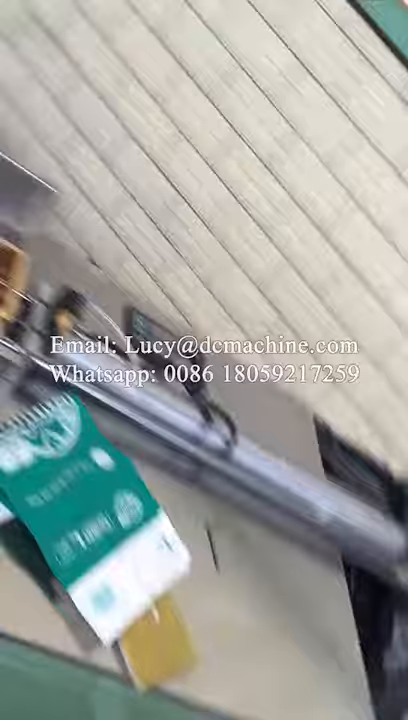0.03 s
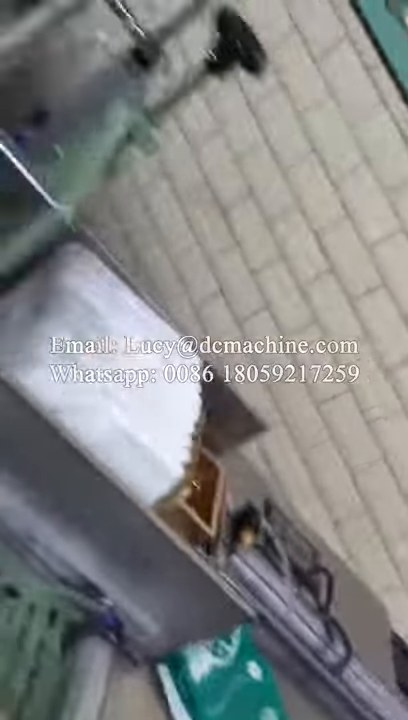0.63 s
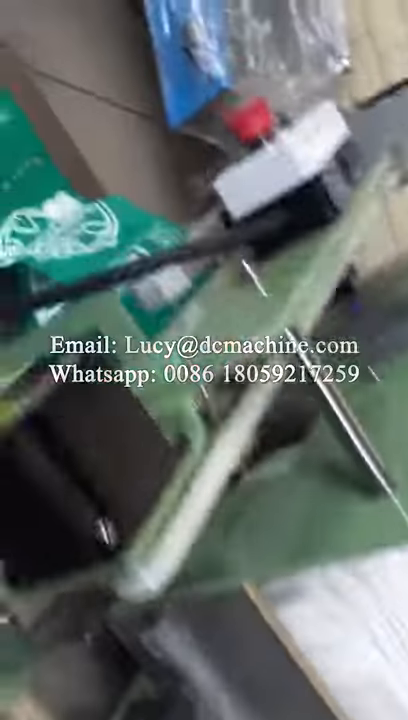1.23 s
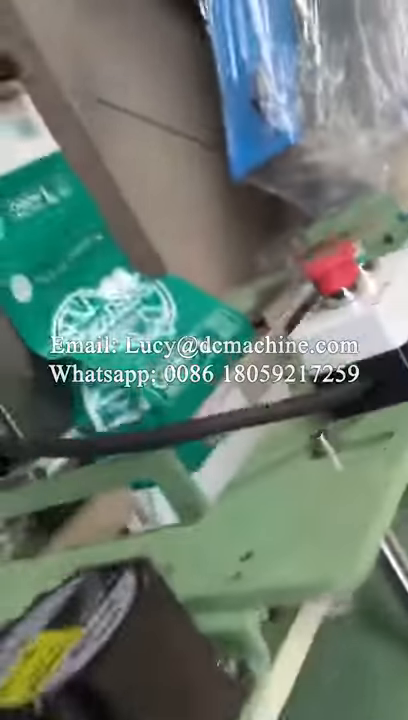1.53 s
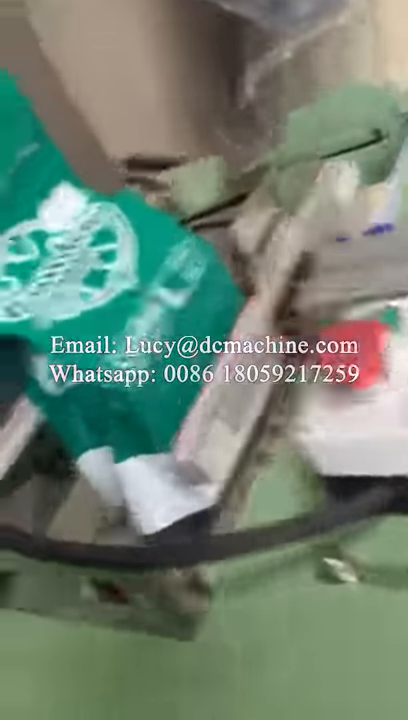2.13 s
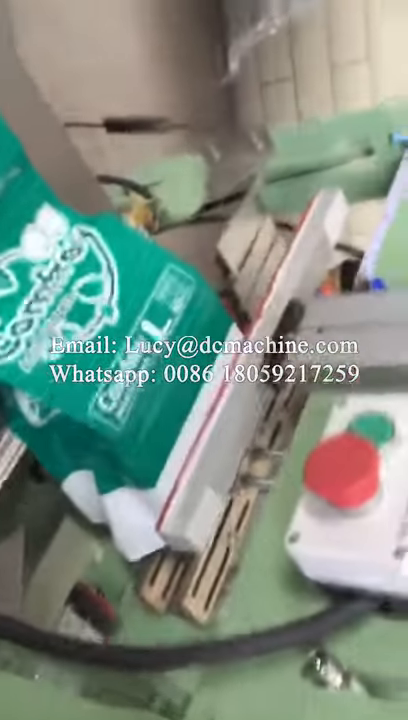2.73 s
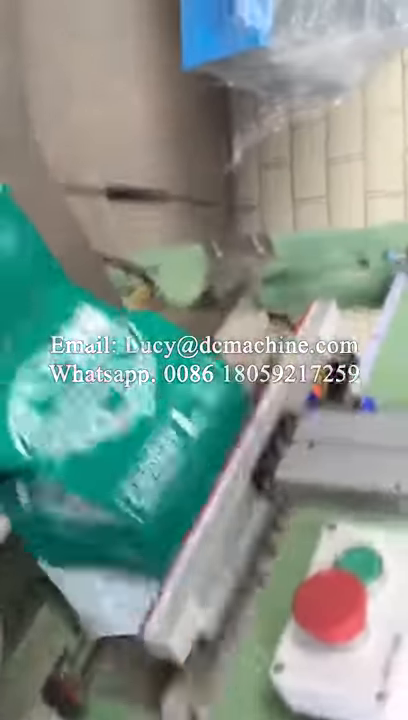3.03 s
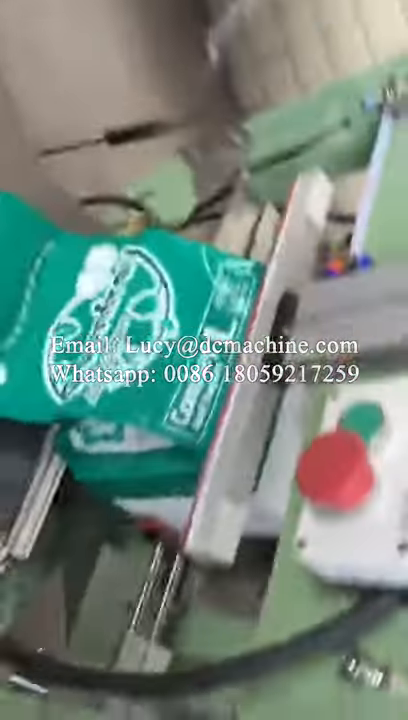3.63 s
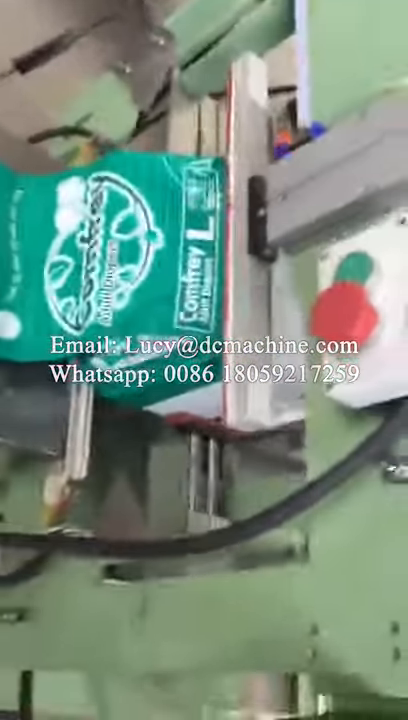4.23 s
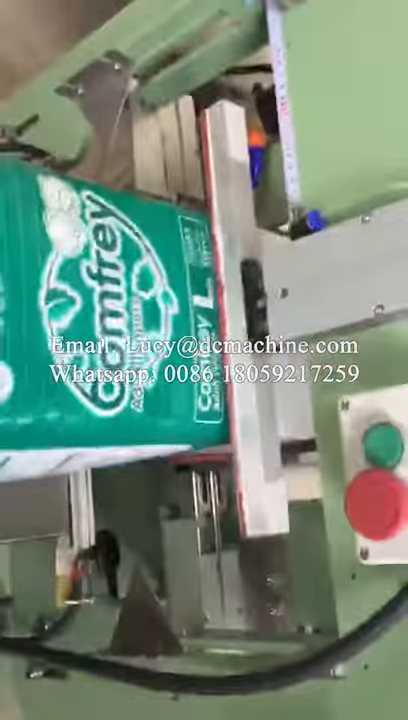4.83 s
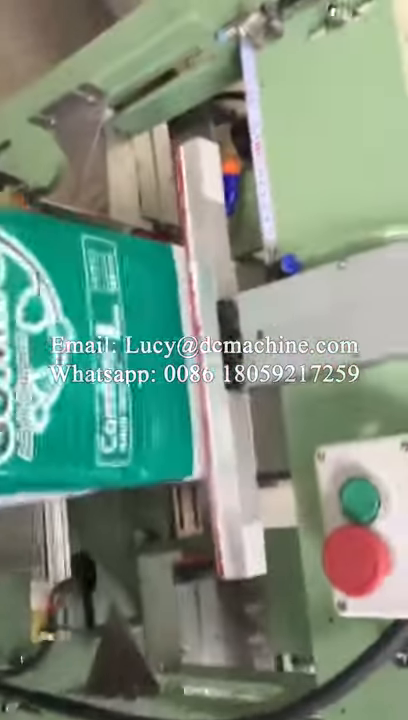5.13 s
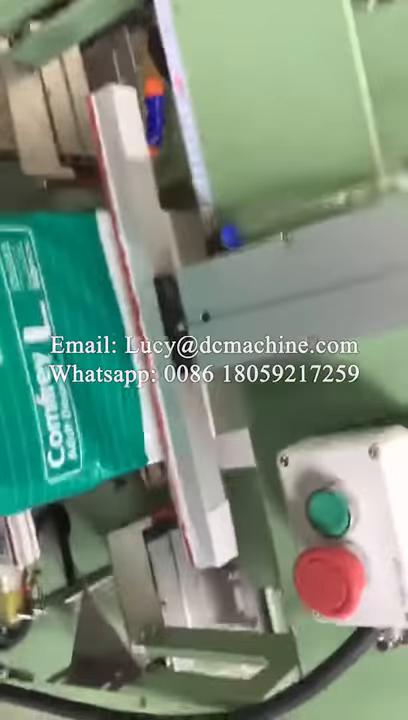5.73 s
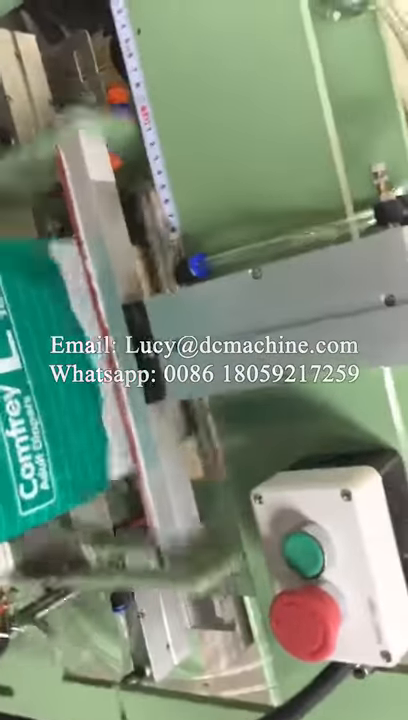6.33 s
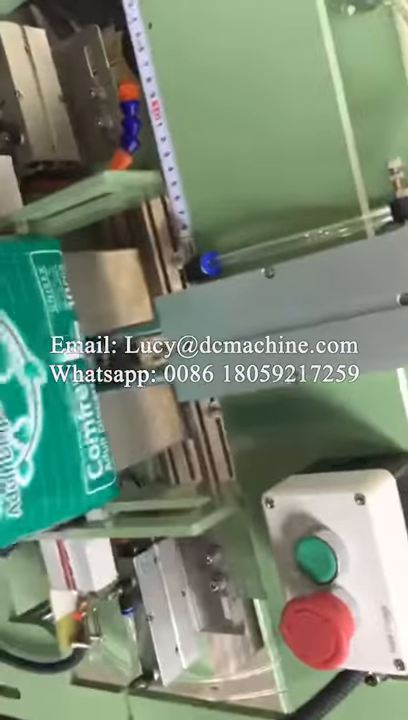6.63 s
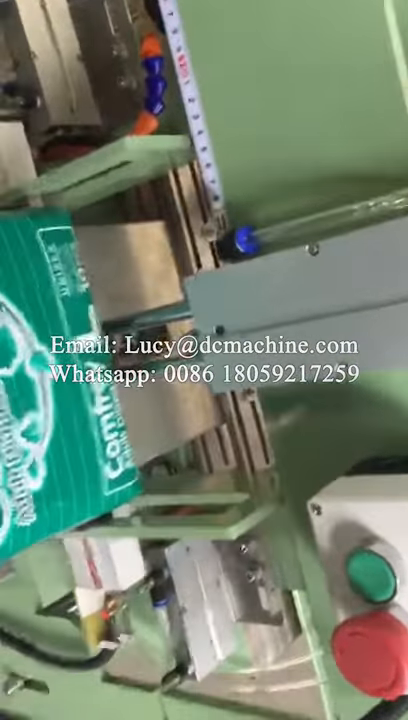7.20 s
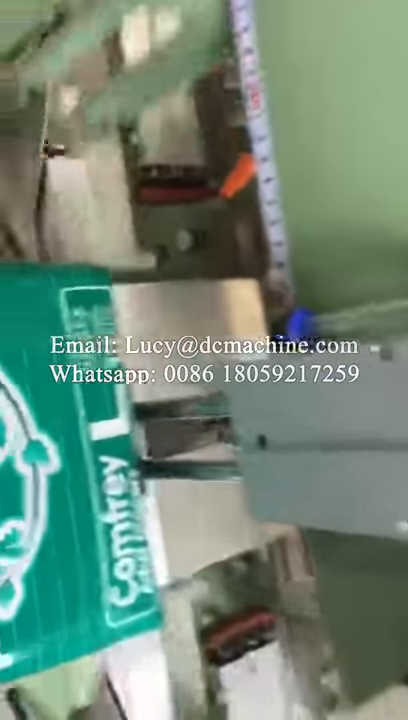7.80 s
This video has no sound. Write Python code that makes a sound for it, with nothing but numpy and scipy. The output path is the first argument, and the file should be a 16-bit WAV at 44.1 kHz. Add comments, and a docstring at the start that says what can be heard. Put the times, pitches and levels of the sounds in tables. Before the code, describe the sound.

A bagging machine clunks, hisses air, scrapes and clashes shut through one cycle, over steady motor whine and factory hum.

```python
"""A pneumatic bagging machine runs one cycle in a factory hall, amid motor whine, hum and leaking air.
Near 3 s the bag opener slams into its stops, ringing the steel frame, and valves vent with whistles
that fall with the cylinder pressure. From 3.8 s an air jet holds the bag open; near 4.8 s the pusher
scrapes over its bed and strikes home. More valves vent, and near 6.5 s the sealing clamp clashes
shut. A few lighter knocks follow, and the motor whines on."""
import sys
import numpy as np
from scipy import signal
from scipy.fft import rfft, irfft, next_fast_len
from scipy.io import wavfile
from scipy.ndimage import uniform_filter1d, map_coordinates

SR = 44100
rng = np.random.default_rng(int(sys.argv[2]) if len(sys.argv) > 2 else 0)


def to_wav(sig):
    """Store sig (one row per channel, or 1-D mono) as 16-bit WAV at the path in sys.argv[1].

    Samples outside -1..1 are clipped; the rate is SR.
    """
    pcm = np.clip(np.atleast_2d(sig), -1, 1) * 32767
    pcm = np.round(pcm).astype(np.int16)
    wavfile.write(sys.argv[1], SR, pcm.T)  # frames by channels


N = 355446

# Valve exhausts: (time [s], length [s], hold [s], first pitch [Hz], limit pitch [Hz],
# half-emptying time [s], relative whistle level [dB], its fall [dB/s],
# lower whistle against it [dB], relative puff level [dB], its fall [dB/s])
VENTS = [(3.005, 0.046, .014, 6800, 3020, .07, -30.5, 20, -5, -30.5, 10),
         (3.312, 0.35, .024, 8060, 1705, .125, -33, 25, -2.5, -26, 15.5),
         (4.96, 0.03, 0.023, 5920, 4000, 0.13, -37.5, 42, -2, -31, 45),
         (5.877, 0.32, 0.037, 6350, 3795, .07, -33, 15, -1, -30.5, 35),
         (6.23, 0.25, .028, 6330, 3804, .07, -34, 25, -1.5, -32.5, 23)]
# Modes of the steel at the bag opener: (frequency [Hz], relative level [dB], t60 [s])
OPENER_MODES = [(86.4, -25.5, .2), (176, -7.5, 0.13), (210, -10, .13), (261, -13, 0.082), (349, -11, 0.082),
                (428, -13.5, 0.14), (848, -16, 0.098), (951, -12.5, 0.12), (1117, -18, 0.15),
                (1591, -15, 0.21), (1890, -20, .16), (2790, -20, .13), (3630, -14, 0.14), (5450, -20, .12),
                (5938, -22, .13), (6304, -24, .13)]


def blows(bounce_s=.0135, dulling_db_per_octave=2.7):
    """Inelastic impact: opener, pusher and clamp hit their stops, each blow with one duller rebound."""
    # Blows of each part: (time [s], relative level [dB], tilt [dB/octave], body frequency [Hz],
    # body boost [dB], rattle t60 [s], rebound against the blow [dB])
    opener_blows = [(2.937, -40.5, 4, 1320, 13.5, 0.054, -13), (2.996, -46.5, -4, 330, 7.5, .15, -4),
                    (3.04, -36.5, 3.5, 2320, 6.3, 0.21, -3), (3.135, -41, 4, 2000, 8, 0.055, -20),
                    (3.163, -24.5, 1.3, 364, 7.5, 0.19, -9), (3.177, -25, -0.5, 200, 12.5, 0.094, -23),
                    (3.192, -30.5, 2, 1900, 8.5, .06, -4), (3.243, -41, -3, 172, 11, 0.14, -10),
                    (3.268, -23.5, 1.3, 656, 9.5, 0.074, -2), (3.31, -40.5, -3.5, 220, 10, .1, -11),
                    (3.433, -35.5, -1.5, 950, 14.5, 0.062, -7),
                    (3.8037, -35.5, -1.3, 300, 12.7, 0.054, -16.5)]
    pusher_blows = [(4.806, -38, -0.5, 1310, 18, 0.14, -12), (4.862, -39, -0.5, 390, 16, 0.1, -2.5),
                    (4.878, -33, 0, 1900, 11, .073, 0.5), (4.8987, -25, 2, 4200, 3, 0.017, -6),
                    (4.904, -24.5, 1.5, 3000, 12, 0.018, -7), (4.921, -38.5, -1.5, 330, 12, 0.073, -14),
                    (5.013, -33.5, 3.5, 3000, 5.5, .016, -20), (5.1505, -29, -0.5, 750, 7.7, 0.086, -4.5),
                    (5.159, -32, 2, 3000, 4, .05, -6), (5.168, -30, -2, 148, 7.7, 0.32, -10),
                    (5.183, -31.5, -2, 850, 11.2, 0.16, -19), (5.222, -36.5, -1.5, 200, 5.2, 0.6, -19),
                    (5.379, -45, -1, 400, 11.6, 0.39, -12)]
    clamp_blows = [(6.4448, -28, 1, 850, 12.2, 0.1, -7), (6.458, -27, 0.3, 360, 13.8, 0.083, -6),
                   (6.473, -32, 2.5, 2010, 8.4, .08, -12), (6.4815, -21.5, 3.1, 382, 9.7, 0.079, -4.5),
                   (6.521, -29, -1, 420, 9, 0.044, -16), (6.594, -48.5, -5, 150, 6, 0.18, -18),
                   (6.999, -36.5, -3, 676, 10.5, 0.051, -11), (7.017, -45, -2, 142, 23.7, 0.23, -13),
                   (7.051, -47, -1.5, 121, 13.5, 0.33, -14)]
    # Modes of the steel at each part: (frequency [Hz], relative level [dB], t60 [s])
    pusher_modes = [(86, -13.5, 0.43), (165.5, -18, 0.17), (212, -15.5, 0.29), (326, -16, 0.17),
                    (696, -15, 0.093), (936, -18, 0.089), (1283, -17.5, 0.12), (1575, -15, 0.083),
                    (2120, -30, 0.14), (2880, -14, .11), (3660, -18, 0.43), (3750, -16, .4),
                    (4620, -14, .2)]
    clamp_modes = [(91, -18.5, 0.16), (139.6, -15.5, 0.38), (188, -10.5, 0.18), (290, -13, 0.099),
                   (364, -13, .08), (431, -8, 0.11), (515, -14.5, .1), (1140, -12, 0.14), (1263, -10, 0.13),
                   (2035, -18, 0.11), (2910, -21, 0.15), (4475, -12, .14), (5177, -15, .05),
                   (6150, -22, .15)]
    out = np.zeros(N)
    parts = (opener_blows, OPENER_MODES), (pusher_blows, pusher_modes), (clamp_blows, clamp_modes)
    for rows, modes in parts:
        for s, db, tilt, body_hz, body_db, t60, rebound_db in rows:
            add(out, s, contact(modes, db, tilt, body_hz, body_db, t60))
            rebound = contact(modes, db + rebound_db, tilt - dulling_db_per_octave, body_hz, body_db, t60)
            add(out, s + bounce_s, rebound)
    return out


def contact(modes, db, tilt, body_hz, body_db, t60, attack_s=.00041, snap_s=.00069, pivot_hz=900):
    """Impulse excitation: a blow rattles loose fittings and rings damped modes; harder is brighter."""
    # Bands of base, frame, table, panels, guides and stops: (low edge [Hz], high edge [Hz], share [dB])
    part_bands = [(63.6, 119, -5), (136.6, 256, -1.5), (254, 460, -0.5), (580, 1396, 1), (1200, 2600, 0.5),
                  (3500, 6900, 1)]
    t = np.arange(SR // 2) / SR
    mode_hz, mode_db, mode_t60 = np.transpose(modes)[:, :, None]
    rattle = unit(rng.standard_normal(len(t)) * amp(-4 * wobble(362, len(t))))
    snap_db = 2 * np.exp(-t / snap_s)
    rattle *= amp(snap_db - 60 * t / t60)
    freedom = min(t60 / .13, 1)  # a short blow presses on the steel and weakens its modes
    strength = amp(mode_db - 2 + rng.normal(0, 3, mode_hz.shape)) * freedom
    phase = 2 * np.pi * (mode_hz * t + rng.random(mode_hz.shape))
    ring = np.sum(strength * amp(-60 * t / mode_t60) * np.sin(phase), axis=0)
    shake = (rattle + ring) * (1 - np.exp(-t / attack_s))
    size = np.linalg.norm(amp(-60 * t / t60))  # a longer rattle carries more energy
    out = np.zeros(len(t))
    for low_hz, high_hz, share_db in part_bands:
        centre_hz = np.sqrt(low_hz * high_hz)
        boost_db = body_db * np.exp(-(np.log2(centre_hz / body_hz) / .99) ** 2)
        colour_db = share_db + tilt * np.log2(centre_hz / pivot_hz) + boost_db
        part = band(shake, low_hz, high_hz)
        out += amp(db + colour_db) * size * part / np.linalg.norm(part)
    return out


def jaws(clash_s=6.4822, attack_s=.00044):
    """Beating of close modes: the clamp's steel jaws clash brightly and shimmer on."""
    # Mode clusters of the jaws: (frequency [Hz], width [Hz], level [dB], t60 [s])
    clusters = [(1550, 145, -37, .5), (2096, 220, -32, .55), (4350, 340, -20, .06), (4620, 176, -28, 0.45),
                (5220, 320, -9, .06), (5160, 260, -30.5, 0.43), (6650, 220, -35, .5), (7100, 300, -31, .25)]
    out, t = np.zeros(N), np.arange(SR) / SR
    ring = sum(amp(db - 60 * t / t60) * narrow(2 * np.pi * hz * t, width)
               for hz, width, db, t60 in clusters)
    add(out, clash_s, ring * (1 - np.exp(-t / attack_s)))
    return out


def valve_thuds(lead_s=.006):
    """Soft impact: each valve shifts with a dull thud just before it vents."""
    out = np.zeros(N)
    for s, *_, puff_db, _ in VENTS:
        thud = contact(OPENER_MODES, puff_db - 11, tilt=-3, body_hz=334, body_db=6.5, t60=.086)
        add(out, s - lead_s, thud)
    return out


def exhausts(lower_ratio=.87, rise_s=.0034, pressure_span_db=8.5):
    """Flow tones: a venting cylinder puffs and sings two whistles that hold, then sink with pressure."""
    def sing(phase):
        return unit(narrow(phase, width_hz=90) * amp(3.2 * wobble(40, len(phase))))

    whistles, puffs = np.zeros(N), np.zeros(N)
    for s, length, hold, first_hz, limit_hz, emptying, db, fall, lower_db, puff_db, puff_fall in VENTS:
        t = np.arange(int((length + .1) * SR)) / SR
        onset = 1 - np.exp(-t / rise_s)
        pressure = 1 / (1 + np.maximum(t - hold, 0) / emptying)
        phase = 2 * np.pi * np.cumsum(limit_hz + (first_hz - limit_hz) * pressure) / SR
        upper = sing(phase)
        lower = amp(lower_db) * pressure ** .28 * sing(lower_ratio * phase)
        breath = amp(-1) * pressure * narrow(phase, width_hz=1100)
        whistle_gate = onset * np.clip((length - t) / .069 + 1, 0, 1)
        whistle_db = db - fall * t - pressure_span_db * (1 - pressure)
        add(whistles, s, whistle_gate * amp(whistle_db) * (upper + lower + breath))
        hiss = unit(band(rng.standard_normal(len(t)), 5100, 12400))
        puff_gate = onset * np.clip((length - t) / .1 + 1, 0, 1)
        add(puffs, s, puff_gate * amp(puff_db - 3 - puff_fall * t) * hiss)
    return whistles + amp(1) * frame_echo(whistles) + puffs


def slide(catch_db=3, catches_per_s=260):
    """Stick-slip friction: the pusher grates over its bed in quick, uneven catches."""
    # Course of the scrape: (time [s], relative level [dB])
    levels = [(4.79, -35), (4.81, -23), (4.84, -27.5), (4.86, -22.5), (4.9, -18.5), (4.93, -23.5),
              (4.96, -67)]
    # Friction spectrum: (frequency [Hz], relative density [dB])
    spectrum = [(59, -43), (100, -13), (345, -3.5), (620, -14.5), (900, -10.5), (1500, -12.5), (2800, -15),
                (11100, -26), (12000, -30), (15600, -66), (22000, -120)]
    grate = filtered(rng.standard_normal(N), lambda hz: amp(along(spectrum, hz)))
    return amp(curve(levels) - 1.5) * unit(grate * amp(catch_db * wobble(catches_per_s)))


def jets(on_s=3.77, off_s=5.08, attack_s=.046, release_s=.27, leak_db=-40, jet_db=-34):
    """Turbulent jet noise: air leaks throughout, and blows louder and brighter to hold the bag open."""
    # Jet spectrum: (frequency [Hz], relative density [dB])
    spectrum = [(1500, -14), (3000, -5), (4200, -0.5), (6500, 1), (8500, 2), (9700, 1.5), (10400, -3.5),
                (11400, -0.5), (12000, -16.5)]
    t = np.arange(N) / SR
    opening = np.clip(np.minimum((t - on_s) / attack_s, 1 - (t - off_s) / release_s), 0, 1)
    db = leak_db + (jet_db - leak_db) * opening + .4 * wobble(3.99)
    fizz_db = -40 + 9.7 * (db - jet_db)  # the top treble grows steeply with the flow
    fizz = unit(band(rng.standard_normal(N), 8500, 12400))
    return amp(db) * rush(spectrum, patchy_db=.7) + amp(fizz_db) * fizz


def frame_echo(x, t60=.55):
    """Multiple reflection among the machine's panels lets each pitch of a whistle linger."""
    t = np.arange(SR // 2) / SR
    tail = rng.standard_normal(len(t)) * amp(-60 * t / t60)
    return signal.fftconvolve(x, tail / np.linalg.norm(tail))[:N]


def hall(x):
    """Diffuse reverberation: the hall answers after a short delay, and the high treble dies first."""
    # Reverberation time: (frequency [Hz], t60 [s])
    decay_times = [(100, 1.6), (500, 1.02), (2000, 1.5), (6000, 0.66), (12000, 0.26)]
    hz, t, spectra = signal.stft(rng.standard_normal(SR), SR, nperseg=256)
    tail = signal.istft(spectra * amp(-60 * t / along(decay_times, hz)[:, None]), SR, nperseg=256)[1]
    return signal.fftconvolve(np.pad(x, (SR // 80, 0)), tail / np.linalg.norm(tail))[:N]


def motor_whine(hz=2335.5, flutter_db=2, flutters_per_s=30):
    """Standing waves: a motor's fluttering whine fades briefly as the listener moves through nodes."""
    # Course of the whine between nodes: (time [s], level [dB])
    levels = [(.13, -40.5), (.28, -36.5), (.55, -37), (.8, -38.5), (1.05, -36), (1.32, -36), (1.6, -37.5),
              (2.05, -36.5), (2.3, -33), (2.6, -35), (3.0, -36), (3.35, -46), (3.57, -45), (3.72, -37.5),
              (3.85, -44.5), (4.5, -38.5), (4.7, -44.5), (5.05, -42.5), (5.2, -45), (5.62, -35.5),
              (5.8, -41), (6.0, -37), (6.4, -43), (6.85, -38.5), (7.1, -35.5), (7.7, -36.5), (8.05, -39.5)]
    # Passages through nodes of the hall's standing waves: (time [s], half-width [s])
    nodes = [(.36, 0.045), (.44, .012), (.735, .015), (.78, .012), (.855, .008), (.92, 0.021),
             (1.25, 0.029), (1.42, 0.12), (1.64, 0.011), (1.8, 0.03), (2.11, 0.028), (2.2, 0.053),
             (2.415, 0.029), (2.68, 0.017), (2.93, .008), (3.08, .015), (5.41, 0.014), (5.565, 0.036),
             (5.72, 0.049), (5.92, .03), (6.13, 0.033), (6.3, 0.018), (6.91, 0.02), (6.98, 0.021),
             (7.185, 0.022), (7.4, 0.035), (7.57, 0.012), (7.85, 0.13), (8, .012)]
    t = np.arange(N) / SR
    nulls = np.prod([(t - s) / np.hypot(t - s, width) for s, width in nodes], axis=0)
    flutter = amp(flutter_db * wobble(flutters_per_s))
    return amp(curve(levels)) * nulls * unit(flutter * drifting_tone(hz))


def fan(tone_hz=2157, rush_band_hz=(2057, 2157), waver_db=5):
    """Tonal and turbulent flow noise: a fan sings a wavering tone with a narrow rush just below it."""
    # Course of the fan's tone: (time [s], level [dB])
    levels = [(.2, -47.5), (1.1, -46.5), (2.1, -47), (2.5, -52), (3.6, -50), (4.2, -52.5), (8, -51.5)]
    airflow = unit(band(rng.standard_normal(N), *rush_band_hz))
    tone = unit(amp(waver_db * wobble(16)) * drifting_tone(tone_hz))
    return amp(curve(levels)) * (tone + amp(-2.5) * airflow)


def hum(waver_db=2.5):
    """Line spectrum of rotation: motors and fans hum in weak, wavering tones."""
    # Hum lines: (frequency [Hz], relative level [dB])
    lines = [(45, -60.5), (75, -60), (90, -57.5), (346, -54), (521, -58), (700, -49.5), (716, -47),
             (785, -48.5), (1044, -55.5), (1307, -56), (1432, -54.5), (1568, -57.5)]
    return sum(amp(db - 1.7 + waver_db * wobble(6)) * drifting_tone(hz, 1.883) for hz, db in lines)


def factory(split_hz=330):
    """Incoherent summation: far machines blend into rumble and din; a whir grows nearer the clamp."""
    # Spectrum of the hall's noise: (frequency [Hz], relative density [dB])
    spectrum = [(25, -27), (33, -36), (46, -5.5), (88, 1.5), (115, -4.5), (175, -2.5), (270, -4), (370, -5),
                (480, -4.5), (760, -1.5), (1100, -3.5), (1600, -7), (1850, -13), (2300, -6.5), (3000, -9.5),
                (6500, -6.5), (12000, -28)]
    # Course of each layer at the moving listener: (time [s], level [dB])
    rumble_levels = [(.5, -47.5), (2.3, -46.5), (4.2, -45), (5.65, -40), (6.8, -39.5), (7.7, -42)]
    din_levels = [(0.6, -37.5), (1.8, -40), (2.9, -40), (4.2, -40.5), (5.6, -36), (6.7, -34.5), (7.25, -39),
                  (8.06, -35)]
    whir_levels = [(3.5, -69), (4.4, -45), (5.6, -43), (8, -45.5)]
    noise = rush(spectrum, patchy_db=2.15)
    rumble = filtered(noise, lambda hz: 1 / (1 + (hz / split_hz) ** 4))
    din = filtered(noise - rumble, lambda hz: 1 / np.hypot(1, hz / 7500))
    whir = band(rng.standard_normal(N), 1420, 2240)
    return (amp(curve(rumble_levels)) * unit(rumble) + amp(curve(din_levels) - .1) * unit(din)
            + amp(curve(whir_levels)) * unit(whir))


def rush(spectrum, patchy_db):
    """Coloured noise of rms 1, its gain varying in random patches of time and frequency."""
    spectra = signal.stft(rng.standard_normal(N), nperseg=512)[2]
    patches = uniform_filter1d(rng.standard_normal(spectra.shape), size=6, axis=0)
    patches = uniform_filter1d(patches, size=14, axis=1)
    noise = signal.istft(spectra * amp(patchy_db * unit(patches)), nperseg=512)[1][:N]
    return unit(filtered(noise, lambda hz: amp(along(spectrum, hz))))


def drifting_tone(hz, drift_hz=2):
    """Slow random frequency modulation of a sinusoid of rms 1."""
    return np.sqrt(2) * np.cos(2 * np.pi * np.cumsum(hz + drift_hz * wobble(8)) / SR)


def narrow(phase, width_hz):
    """Quadrature modulation: narrow-band noise around a running phase."""
    return wobble(width_hz, len(phase)) * np.cos(phase) + wobble(width_hz, len(phase)) * np.sin(phase)


def wobble(rate, size=N):
    """A smooth random curve with rate knots a second."""
    knots = rng.standard_normal(int(size * rate / SR) + 4)
    return map_coordinates(knots, [np.arange(size) * rate / SR])


def amp(db):
    """Decibels to amplitude ratio."""
    return 10 ** (np.asarray(db) / 20)


def unit(x):
    """Normalisation to rms 1."""
    return x / np.sqrt(np.mean(x ** 2) + 1e-20)


def along(points, hz):
    """Interpolation of (frequency [Hz], value) points on a logarithmic axis."""
    knots_hz, values = np.transpose(points)
    return np.interp(np.log(hz + 1), np.log(knots_hz + 1), values)


def curve(points):
    """Interpolation of (time [s], level [dB]) points at every sample."""
    return np.interp(np.arange(N) / SR, *np.transpose(points))


def filtered(x, response):
    """Zero-phase filtering by a gain that depends on frequency."""
    size = next_fast_len(N + SR // 2)
    return irfft(rfft(x, size) * response(np.fft.rfftfreq(size, 1 / SR)), size)[:N]


def band(x, low_hz, high_hz):
    """Causal band-pass filtering."""
    return signal.sosfilt(signal.butter(2, [low_hz, high_hz], 'band', fs=SR, output='sos'), x)


def add(track, s, sound):
    """Superposition of a sound on the track at time s."""
    part = track[round(s * SR):][:len(sound)]
    part += sound[:len(part)]


def scene():
    """Superposition: the near machine, its booming echo and the factory, alike in both channels."""
    metal = amp(4) * (blows() + valve_thuds()) + slide() + jaws()
    air = exhausts()
    echo = hall(amp(-16) * metal + amp(-6) * air)
    boom = amp(-13) * hall(band(metal, 59, 215))
    mono = metal + air + echo + boom + jets() + motor_whine() + fan() + hum() + factory()
    return np.array([mono, mono])


def record(dry, start_s=.13, ceiling=.68, top_hz=11850):
    """Saturation and band limiting: after a brief silence, peaks are rounded and the top treble cut."""
    x = dry[0] * (np.arange(N) / SR >= start_s)
    x = x / (1 + (x / ceiling) ** 6) ** (1 / 6)
    x = filtered(x, lambda hz: 1 / np.hypot(1, (hz / top_hz) ** 100))
    return np.array([x, x])


dry = scene()
out = record(dry)
to_wav(out)
```